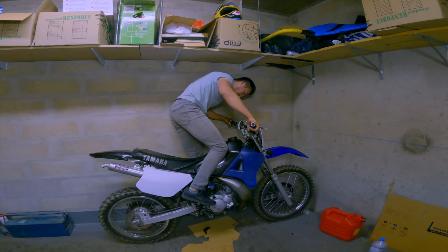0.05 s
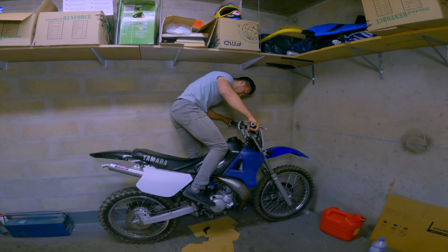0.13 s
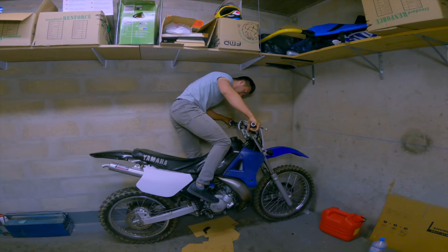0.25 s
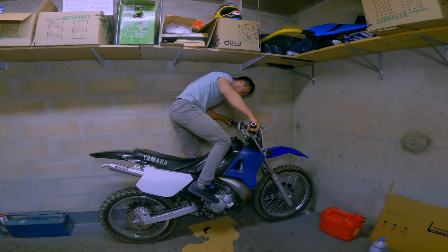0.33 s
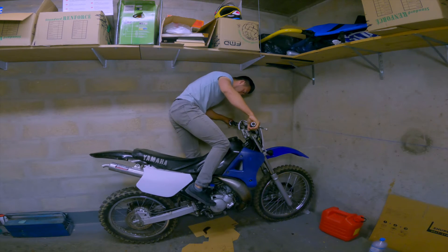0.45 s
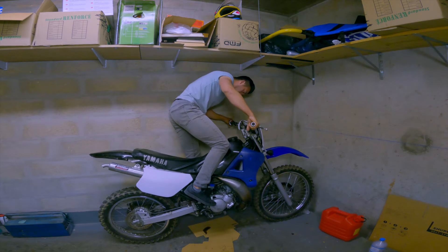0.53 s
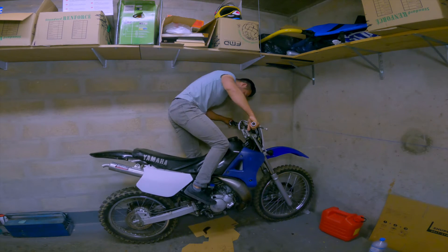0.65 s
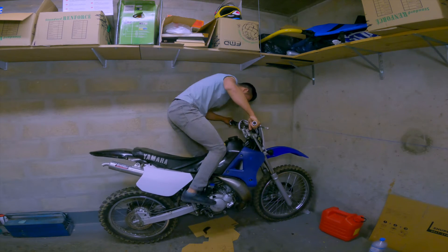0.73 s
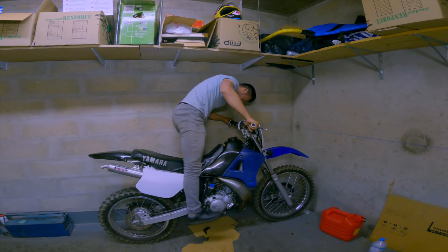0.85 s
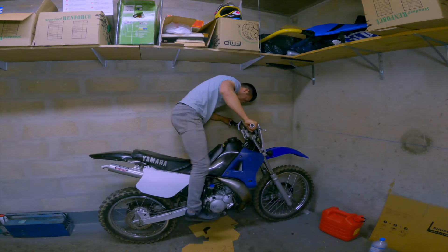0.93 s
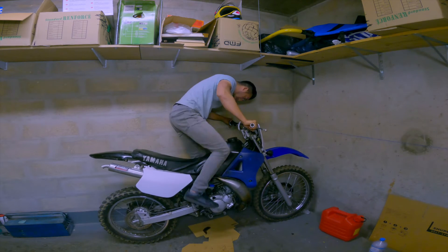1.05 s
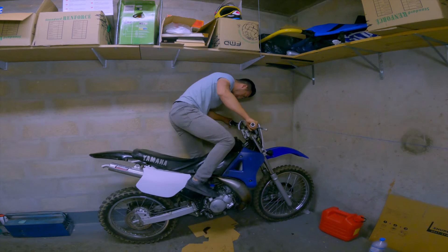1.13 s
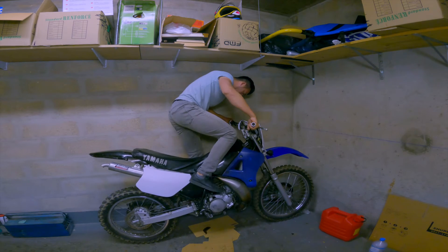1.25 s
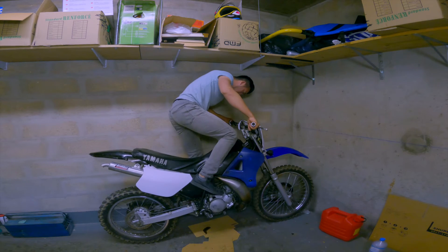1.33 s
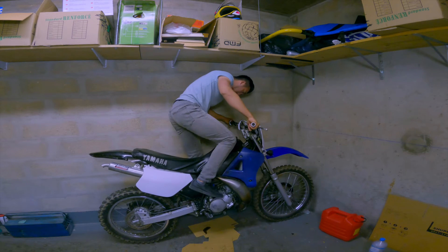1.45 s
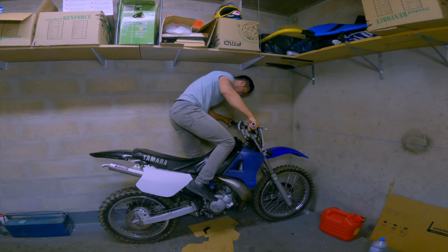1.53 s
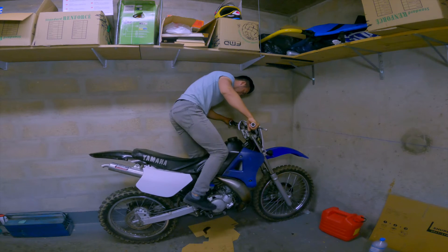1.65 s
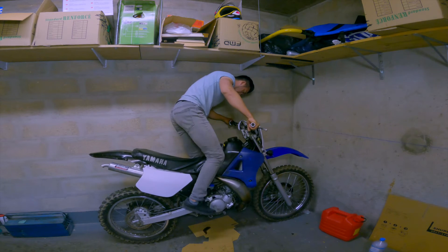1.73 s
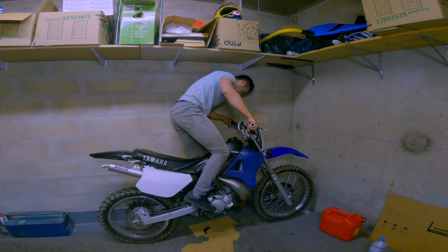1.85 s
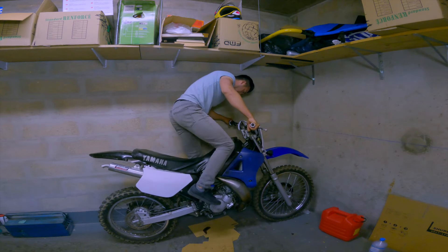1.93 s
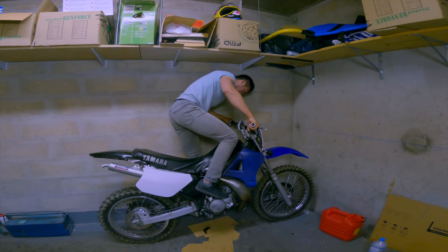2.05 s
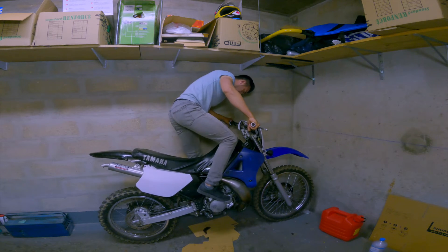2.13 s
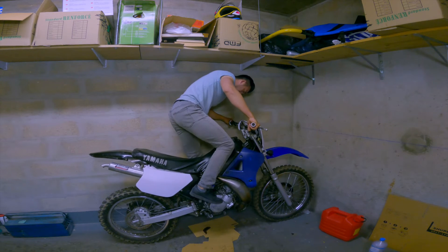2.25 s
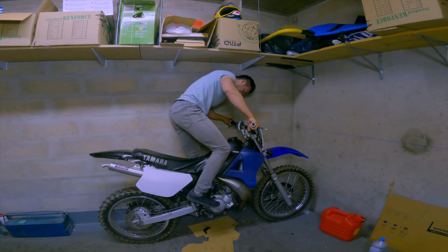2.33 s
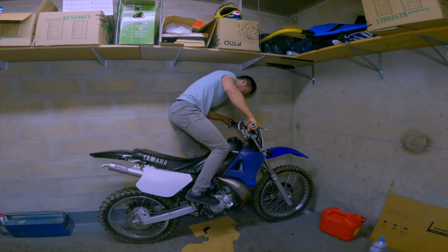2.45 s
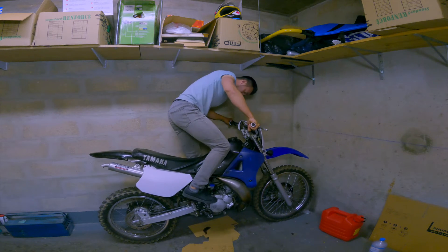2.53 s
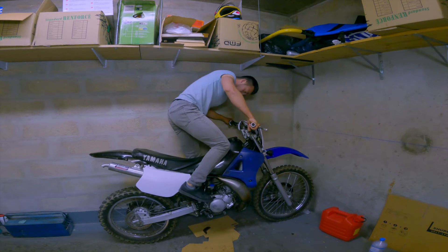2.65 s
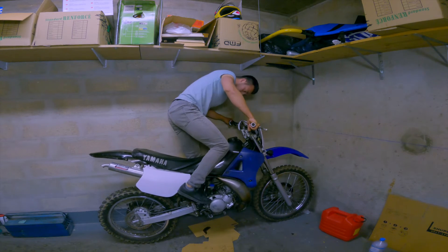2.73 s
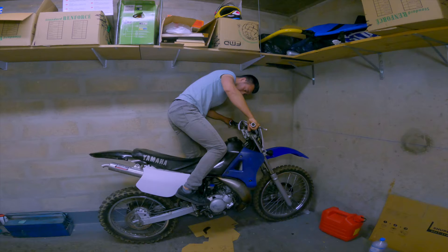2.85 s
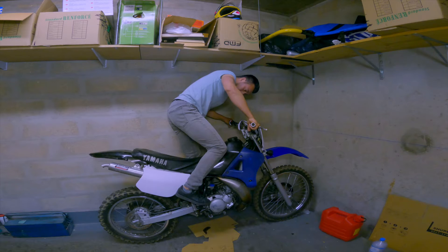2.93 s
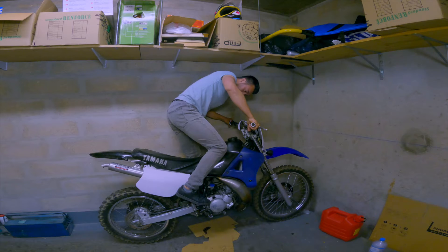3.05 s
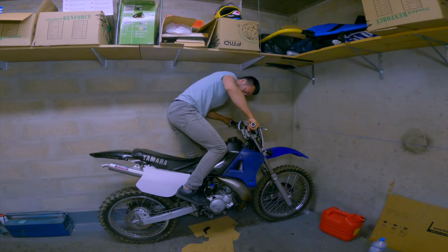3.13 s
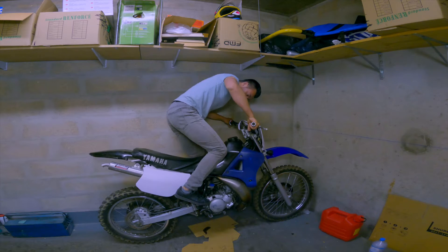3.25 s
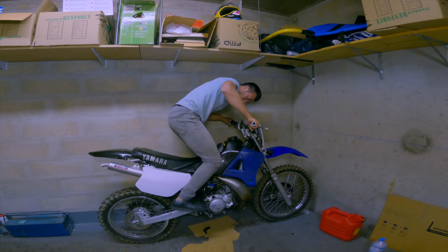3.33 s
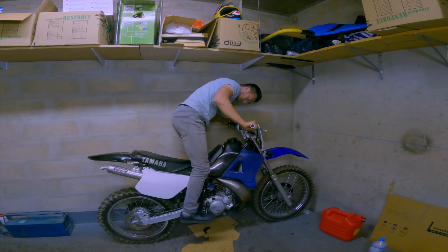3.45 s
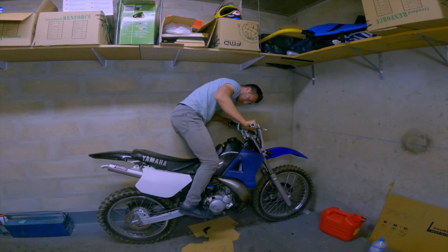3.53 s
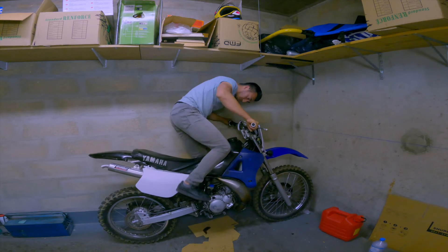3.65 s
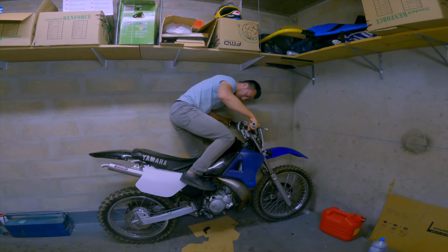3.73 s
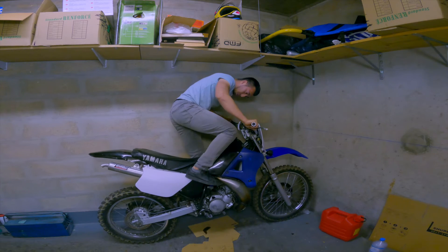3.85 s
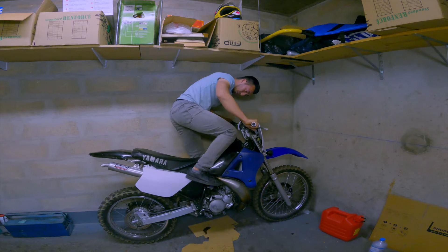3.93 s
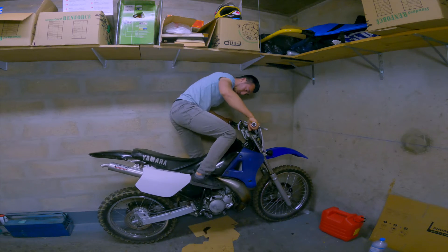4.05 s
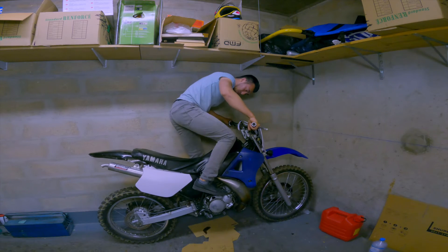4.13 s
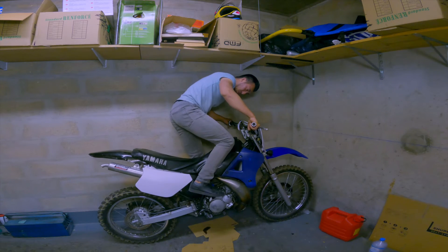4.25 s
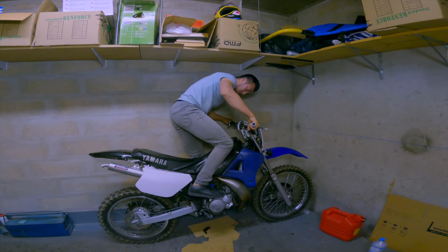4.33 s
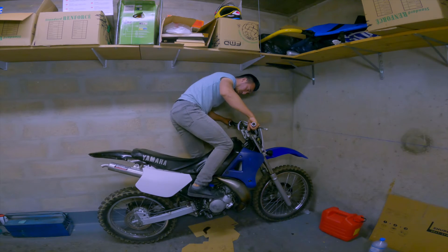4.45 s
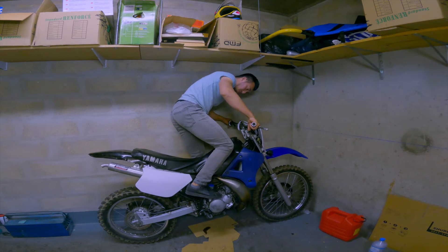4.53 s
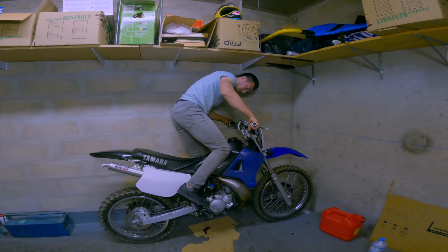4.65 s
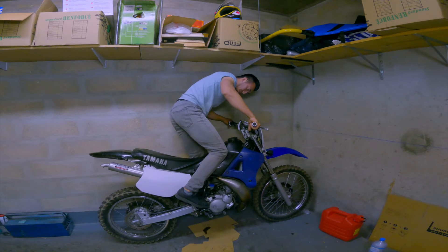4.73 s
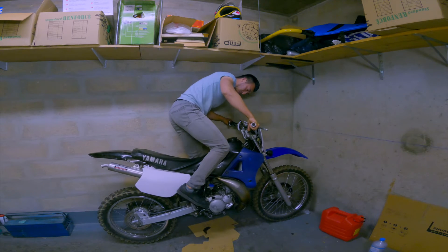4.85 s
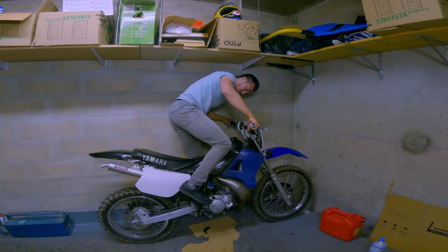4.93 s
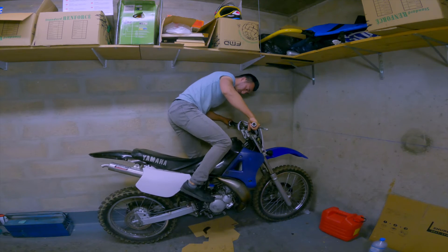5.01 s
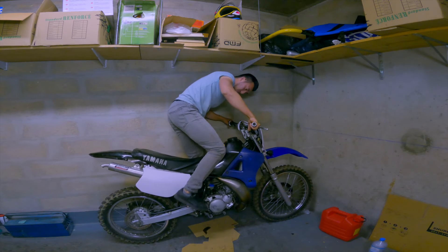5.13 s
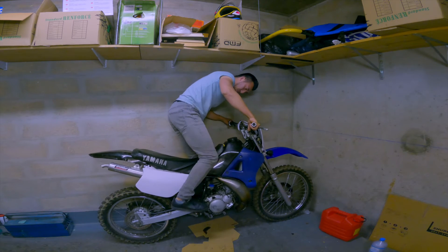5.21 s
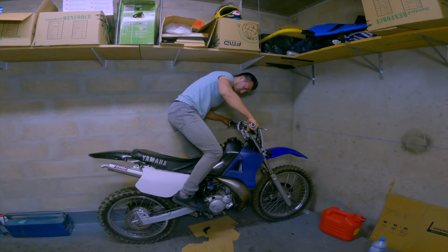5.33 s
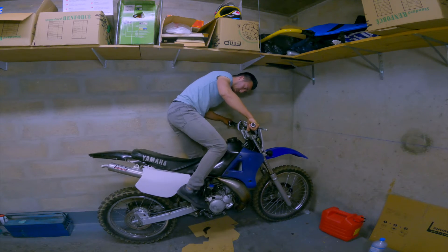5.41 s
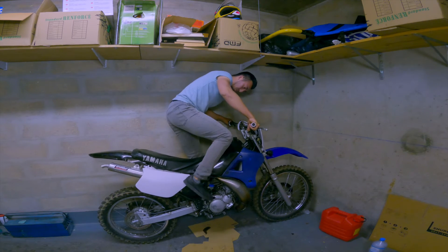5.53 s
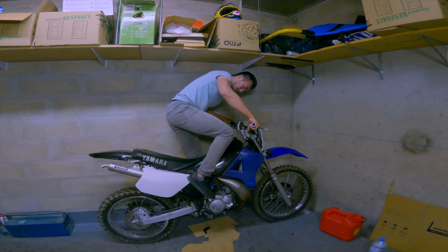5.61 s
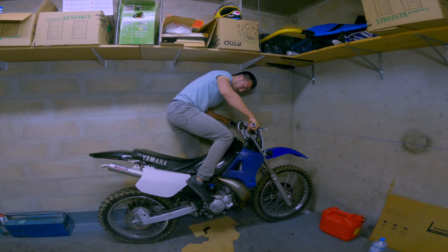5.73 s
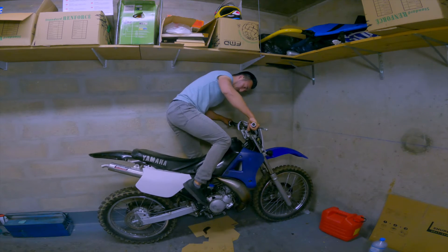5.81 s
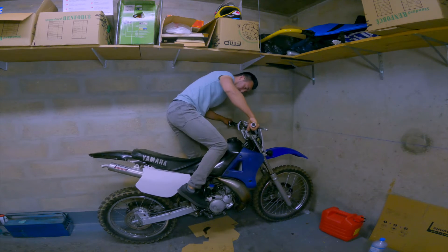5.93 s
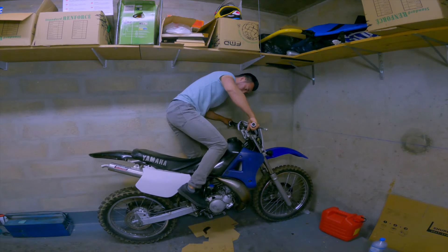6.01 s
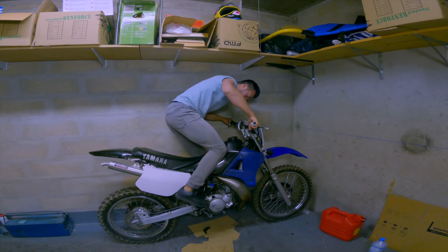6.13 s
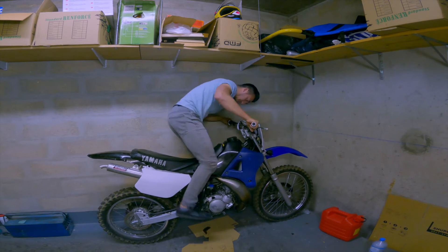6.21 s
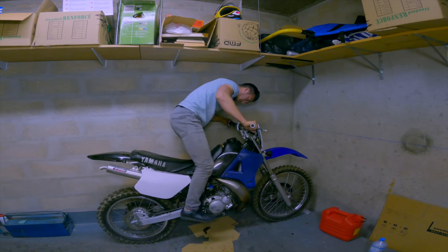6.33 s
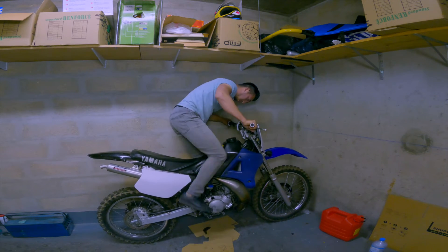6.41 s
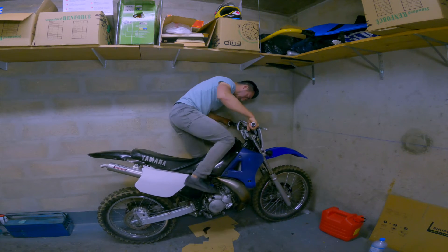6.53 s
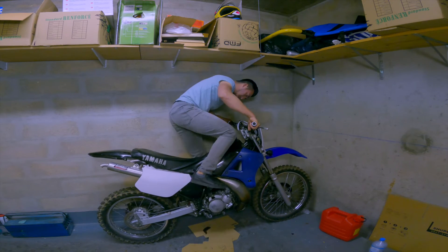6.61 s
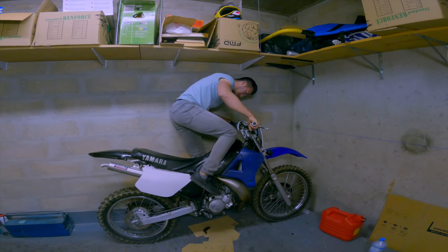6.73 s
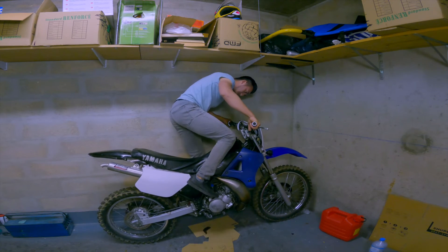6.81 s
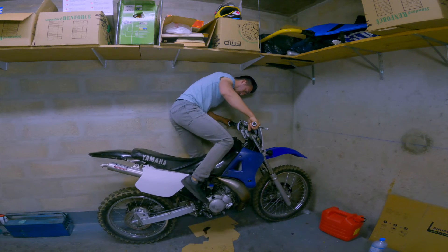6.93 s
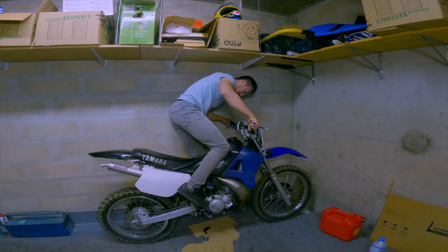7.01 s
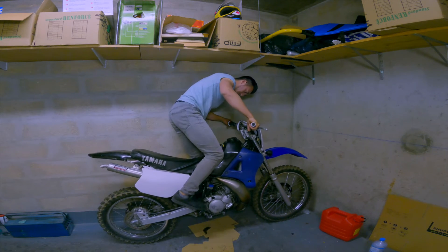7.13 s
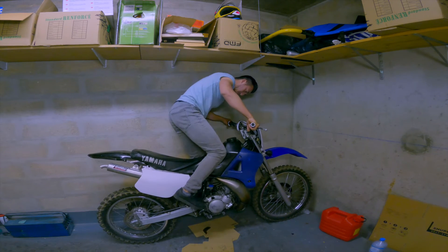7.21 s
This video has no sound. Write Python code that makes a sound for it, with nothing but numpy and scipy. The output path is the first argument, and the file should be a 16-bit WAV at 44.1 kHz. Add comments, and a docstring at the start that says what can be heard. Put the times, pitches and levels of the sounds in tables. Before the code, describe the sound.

A small concrete garage with quiet, steady air noise and short hard echoes. At first only faint frame bumps, a light click at 0.3 s and slight scuffs. At about 0.9 s a kick-start lever bites: steel clacks, gears whir in a coarse rattle for under a fifth of a second, and a few hollow low puffs thump from the exhaust, leaving a bass boom in the room. From 1.2 to 2.5 s the ratchet clacks, with sharper clicks near 2.0 and 2.1 s, scrapes and a tiny squeak. It is nearly quiet around 3 s. The second kick at 3.5 s has a heavier thump and rapid puffs to 3.75 s. Clicks and scrapes follow, with strong clacks near 4.7, 5.25 and 5.6 s. The third kick falls at 6.3 s, chuffing and rattling, then a few clacks, a light bump at 7 s and fading boom. The engine never fires.

```python
"""Kick-starting a dirt bike in a garage

A two-stroke dirt bike is kicked over three times in a small concrete garage and never fires.
Each kick spins the gears (clumps of tiny impacts) and pumps a few hollow puffs through the exhaust
(dying sines and a rush of noise), which set the room booming. Mostly between kicks, the lever and its
ratchet clack and squeak (short chatter, sliding whistles), and a boot scrapes for the next stroke.
The rider's weight rocks the frame, bare walls echo it all, and quiet air noise lies beneath."""
import sys
import numpy as np
from scipy import signal
from scipy.io import wavfile
from scipy.ndimage import uniform_filter1d

SR = 44100
rng = np.random.default_rng(int(sys.argv[2]) if len(sys.argv) > 2 else 0)


def digitize_waveform(pressure):
    """Quantize a signal to 16-bit integers and store it at the path in sys.argv[1].

    Rows of a 2-D input are taken as channels; values are limited to [-1, 1].
    """
    field = np.atleast_2d(pressure).T
    bounded = np.clip(field, -1, 1)
    quanta = np.round(bounded * 32767).astype(np.int16)
    wavfile.write(sys.argv[1], SR, quanta)


N = 320607
T = np.arange(N) / SR  # time of every sample [s]

# All levels are relative: each source has a further level of its own. t60 is the time to die by 60 dB.
# One row a kick: (ratchet bites [s], length of the stroke [s], heave [dB], gears [dB], sag of the gears [dB/s],
# rumble [dB], footpeg ring [dB], factor on the footpeg's pitch [-])
KICKS = [(0.887, 0.15, -28, -21.5, 1, -6, -39, 1.1), (3.461, 0.18, -17, -22.5, 32, -5.5, -51, 1.7),
         (6.309, 0.193, -16.5, -24, 6.5, -6.5, -36, 1.004)]
# One puff a turn of the crank: (time [s], level [dB], deep boom against the pipe's note [dB],
# factor on the pipe's pitch [-])
PUFFS = [(0.915, -11, -4.5, 1.0), (0.971, -19.5, 8, 0.76), (1.035, -12, -4, 0.97), (1.116, -7, -2, 1.0),
         (3.484, -7, -1.5, 0.94), (3.539, -6, 2, 0.94), (3.595, -6.5, -10, 0.96), (3.664, -7, -13, 0.99),
         (3.748, -7.5, -25, 0.99), (4.029, -19, 3.5, 0.96), (6.331, -10, -0.5, 0.97),
         (6.385, -6.5, -4, 0.85), (6.453, -6, -6, 0.97), (6.534, -7.5, -6, 0.97)]
# Notes of the exhaust pipe: (pitch [Hz], level [dB], t60 [s])
PIPE_MODES = [(62.2, -7.5, 0.2), (102.4, -7.5, 0.33), (138.7, -8.5, 0.31), (226.8, -14, 0.5),
              (331.6, -3.5, 0.15), (361.7, 0.5, 0.055), (437.8, 2, 0.063), (495, -12, 0.034)]
# Colour of the unburnt gas leaving the pipe: (frequency [Hz], level [dB])
GAS_COLOUR = [(100, -9), (250, -3.5), (330, 1), (430, -3.5), (520, -0.5), (650, -24), (1500, -38),
              (5000, -69.5), (12000, -120)]
# Colour of the gear rattle: (frequency [Hz], level [dB])
GEAR_COLOUR = [(120, -45), (250, -16.5), (450, -6), (850, -11.5), (1350, -14), (1500, -20), (1850, -19.5),
               (2600, -18), (3200, -25), (5900, -37.5), (11900, -45.5), (15000, -66.5)]
# Resonances of engine case and lever: (frequency [Hz], width [Hz], level [dB])
CASE_MODES = [(1260, 120, -8.5), (1500, 46, -13.5), (1844, 120, 2.5), (2025, 36, -0.5), (2584, 60, -4),
              (2870, 57, -13.5), (3370, 56, -2.5), (4150, 20, -43), (4750, 120, -3), (5200, 370, -2),
              (6050, 780, 0)]
# In every kick the ratchet bites, then the gears slam home: (delay after the bite [s], level [dB],
# treble tilt [dB/octave], chatter decay [s], pitch of the struck part [Hz], its ring [dB])
ENGAGE = [(0.0, -17, -7, 0.012, 1750, 2.5), (0.061, -15, -1, 0.0047, 1900, -4.5)]
# Lever and ratchet clacking, mostly between strokes, sometimes within one: (time [s], level [dB],
# treble tilt [dB/octave], chatter decay [s], pitch of the struck part [Hz], its ring [dB])
CLACKS = [(0.326, -33, -5, 0.021, 2980, -15), (0.585, -45.5, 7.5, 0.015, 1690, 17),
          (0.935, -15, 0.5, 0.035, 2580, -4), (1.158, -26.5, 6, 0.0066, 1780, 22),
          (1.253, -20, -0.5, 0.006, 1800, -10), (1.484, -39.5, 3.5, 0.037, 1499, 21),
          (1.643, -34, 0.5, 0.027, 1990, -1), (1.714, -32, -3, 0.0085, 2320, -1),
          (1.886, -42, 7, 0.0089, 2270, 14), (2.003, -18.5, 2, 0.0076, 1860, 6.5),
          (2.118, -22, -1, 0.0075, 1880, 2), (2.306, -35.5, 2.5, 0.015, 1934, 5),
          (2.434, -29, -3.5, 0.0081, 2070, 11), (2.89, -49, -6.5, 0.017, 1286, -1.5),
          (2.953, -59.5, 5, 0.013, 1315, 4.5), (3.174, -57.5, 0, 0.01, 1220, 6),
          (3.493, -17, 1.5, 0.0072, 1800, 4), (3.809, -17.5, 2, 0.0062, 6050, 3),
          (3.943, -21.5, -0.5, 0.0073, 1960, -12), (3.994, -31, -8, 0.011, 1330, -9),
          (4.212, -36.5, -3.5, 0.016, 1140, 18), (4.244, -44.5, 1, 0.013, 1500, 6),
          (4.298, -45, 5.5, 0.024, 1490, 25), (4.466, -42, 4.5, 0.014, 1690, 17),
          (4.553, -37.5, 5, 0.037, 1830, 14), (4.655, -37.5, 7, 0.039, 2020, 4),
          (4.697, -17, 1, 0.012, 3480, -3), (4.711, -23, -12, 0.011, 2590, -4),
          (4.995, -32, -4.5, 0.017, 1960, 3), (5.248, -20.5, -1, 0.006, 2980, 8),
          (5.517, -30, -2.5, 0.0067, 2580, -1), (5.577, -18, 2, 0.0077, 4200, 3),
          (5.698, -29.5, -5.5, 0.0048, 2060, 6), (5.855, -28, 1.5, 0.0049, 2480, -8),
          (5.87, -31.5, -2.5, 0.025, 2580, 6), (5.982, -30, -3.5, 0.0087, 2100, 10),
          (6.231, -30, -2.5, 0.018, 2400, -9), (6.630, -20.5, 0, 0.0059, 1845, 6),
          (6.775, -22, -0.5, 0.0061, 1950, -13), (7.006, -25.5, -1, 0.015, 1825, -29),
          (7.126, -25.5, -2, 0.0055, 2480, -2)]
# Colour of steel on steel: (frequency [Hz], level [dB])
STEEL_COLOUR = [(240, -21), (400, -8.5), (1020, -8.5), (1690, -3), (1820, -5.5), (2320, -3), (2540, -1.5),
                (3100, -3), (4130, -4), (11600, -32.5), (13100, -39.5), (15000, -75.5)]
# Footpeg notes: (pitch [Hz], level [dB], t60 [s])
FOOTPEG_MODES = [(5200, -1, 0.093), (5460, -1.5, .1), (8400, 2, .13), (9430, -27.5, .25), (11700, -6, .15),
                 (12560, -22, 0.18)]
# Boot and lever scraping: (time [s], level [dB], centre [Hz], decay [s])
SCRAPES = [(0.203, -48.5, 1880, 0.061), (0.686, -46.5, 1070, 0.025), (1.005, -18, 740, 0.03),
           (1.411, -55, 880, 0.032), (1.511, -38, 650, 0.017), (1.734, -35, 640, 0.025),
           (1.79, -33, 1720, 0.014), (1.829, -36.5, 805, 0.043), (1.925, -36, 1270, 0.044),
           (2.513, -32.5, 1770, 0.0098), (2.573, -36.5, 1090, 0.0071), (3.575, -39, 830, 0.0098),
           (3.713, -24, 780, 0.02), (3.772, -23, 2110, 0.0086), (4.217, -36.5, 670, 0.034),
           (4.488, -35, 1890, 0.019), (4.569, -35.5, 2000, 0.032), (4.673, -35, 2540, 0.028),
           (5.198, -31.5, 2140, 0.066), (5.459, -36, 1020, 0.0099), (5.499, -34, 2070, 0.038),
           (5.813, -38, 1900, 0.015), (6.182, -43.5, 2010, 0.1), (6.242, -29.5, 800, 0.023),
           (6.322, -16, 2130, 0.012), (6.424, -41.5, 1420, 0.011), (6.617, -25, 1820, 0.015),
           (6.754, -33.5, 1890, 0.015)]
# The lever's dry pivot squeaking: (time [s], level [dB], pitch [Hz], decay [s])
SQUEAKS = [(1.207, -48.5, 9660, 0.0092), (2.127, -32.5, 8800, 0.0045), (2.131, -33, 9160, 0.0047),
           (2.127, -53, 15200, .008), (5.447, -49.5, 3930, 0.017), (5.777, -40.5, 8440, 0.0031),
           (6.708, -57, 9680, 0.01)]
# Dull bumps of the frame, and one very faint short tap at 6.054 s: (time [s], level [dB],
# factor on the frame's pitch [-], knock against the low thud [dB])
BUMPS = [(0.004, -38, 0.79, 6), (0.053, -32.5, 1.02, -5), (0.3, -35, 0.95, -6.5), (0.835, -32, 0.89, -11),
         (1.673, -29, 0.99, 5), (2.123, -34.5, 0.94, -2.5), (2.243, -34, 0.89, 6),
         (2.499, -35.5, 0.79, 2.5), (3.416, -21, 0.71, 0.5), (4.217, -31, 0.95, 1.5),
         (4.724, -19.5, 0.99, 2.5), (5.257, -23, 0.95, -3.5), (6.054, -52.5, 1.05, 11),
         (6.238, -18.5, 0.89, 5), (7.01, -35, 0.99, 6)]
# Notes of the frame: (pitch [Hz], level [dB], t60 [s])
FRAME_MODES = [(71.3, -5, 0.42), (138.4, 1.5, 0.25), (179.5, -3.5, 0.25), (202, -9.5, 0.07),
               (310, -4, 0.13), (423, 0, 0.032)]
# The rider shifting his weight between kicks: (time [s], rumble [dB], rustle [dB])
ROCKING = [(0.0, -33, -36.5), (0.16, -37, -66.5), (0.55, -43, -50.5), (0.78, -51, -63), (1.55, -34, -60),
           (1.882, -23.5, -44), (2.06, -38.5, -50.5), (2.6, -42.5, -48.5), (2.78, -51, -61.5),
           (3.28, -62.5, -83), (3.8, -49, -36), (4.42, -41.5, -63), (4.78, -29, -42), (5.14, -43.5, -60),
           (5.3, -32.5, -49.5), (6.13, -55, -57.5), (6.6, -56, -52), (7.27, -28, -53)]
# Colour of tyres and panels: (frequency [Hz], level [dB])
RUMBLE_COLOUR = [(15, -29.5), (30, -18), (45, -14), (68, -2), (85, -3.5), (105, -2), (140, -2.5),
                 (175, -12.5), (260, -24.5), (340, -16), (480, -24), (800, -31), (2000, -75), (12000, -130)]
# Colour of clothes and seat: (frequency [Hz], level [dB])
RUSTLE_COLOUR = [(150, 6), (400, 13.5), (1000, 8), (1900, 6), (3200, 4.5), (6000, -15.5), (8000, -13),
                 (12000, -41.5), (15000, -41)]
# How long the echoes last: (frequency [Hz], t60 [s])
ECHO_T60 = [(100, 1), (400, 0.44), (1300, 0.44), (3500, 0.48), (7000, 0.49), (14000, 0.045)]
# Standing waves between the walls: (frequency [Hz], level [dB], t60 [s])
STANDING_WAVES = [(70.8, -9, 1.2), (80.7, -4.5, 1.5), (99.7, -1, 1.91), (124, -13.5, 0.72),
                  (136.9, -10.5, 2.4)]
# Colour of the echoes that both sides share: (frequency [Hz], level [dB])
SHARED_ECHO_COLOUR = [(40, -25.5), (150, -14.5), (400, -7.5), (900, -2.0), (3000, -8), (10000, -2.5)]
# Colour of the echoes that differ from left to right: (frequency [Hz], level [dB])
SIDE_ECHO_COLOUR = [(60, -39.5), (250, -29), (550, -10.5), (2000, -8), (5000, -9.5), (12000, -5.5)]
# Colour of the still air: (frequency [Hz], level [dB])
AIR_COLOUR = [(18, -35), (30, -4), (97, -5), (200, -7.5), (253, -25), (426, -22.5), (567, -52.5),
              (978, -26), (1920, -26), (3680, -41), (7060, -34.5), (15000, -64)]

# The gears take up their slack, spin while the leg pushes, then coast to rest.
SLACK_DB, SLACK_DB_PER_S, BITE_S = -5, 326, 0.006
COAST_DB_PER_S = 62
# The rider's weight comes on this long before the ratchet bites, and the bike bounces at this pitch.
LEAD_S, HEAVE_HZ = 0.049, 62
# The bike shakes on its tyres through the stroke, a little longer, then settles.
SHAKE_DB_PER_S, SHAKE_PEAK_S, SHAKE_HOLD_S, SETTLE_DB_PER_S = 231, 0.064, 0.042, 53.5
# The clack at the bottom of the stroke.
STOP_DB, STOP_TILT_DB, STOP_DECAY_S, STOP_HZ, STOP_RING_DB = -18, 6.5, 0.0067, 1590, 10.5
# First contact against the chatter; the chatter's rise as a share of its decay.
BITE_DB, RISE_SHARE = -13.5, 0.2
TICKS_PER_S, TICKS_DB = 25, -12.5  # loose small parts, against the rustle
AIR_DB = -60.5
EDGE_HZ = 15150  # upper edge of the whole sound


def exhaust(rise=0.0029, gas_db=-11, level_db=-1):
    """The piston uncovers the port once a turn; unburnt gas thumps the pipe and rushes out."""
    out, t = np.zeros(N), T[:SR // 2]
    deep = np.array([hz < 200 for hz, _, _ in PIPE_MODES])[:, None]
    outflow = np.exp(-t / 0.045)
    for s, db, boom_db, pitch in PUFFS:
        modes = ring(PIPE_MODES, t, pitch) * (1 - np.exp(-t / rise))
        note = (modes * ~deep).sum(0)  # the hollow bark of the silencer
        boom = (modes * deep).sum(0) * amp(boom_db) / abs(note).max()  # the whole length of the pipe
        gas = colour(rng.standard_normal(len(t)) * outflow, GAS_COLOUR)
        puff = peaked(note) + amp(6.5) * boom + amp(gas_db) * peaked(gas)
        add(out, s, amp(db + level_db) * puff)
    return out


def gears(swing_db=4, lag_turns=0.72, clump_db=5.0, level_db=-3):
    """Teeth and chain rattle in clumps while the crank spins, hardest as the piston comes up on compression."""
    puff_times = [row[0] for row in PUFFS]
    turns = np.interp(T, puff_times, np.arange(len(PUFFS)))
    swing = swing_db * np.cos(2 * np.pi * (turns - lag_turns))
    clumps = np.tanh(evened(uniform_filter1d(rng.standard_normal(N), size=300)))
    impacts = grit(N, per_s=1300, spread_db=2.0) * amp(clump_db * clumps)
    teeth = evened(colour(case(impacts), GEAR_COLOUR))
    return teeth * spin() * amp(level_db + swing)


def spin():
    """Loudness of the gear train: slack taken up, a sudden bite, a sag through the stroke, a coast to rest."""
    out = np.zeros(N)
    for start, stroke, _, db, sag_db_per_s, *_ in KICKS:
        t = T - start
        slack = amp(SLACK_DB - SLACK_DB_PER_S * abs(t))
        sag_db = sag_db_per_s * np.clip(t, 0, stroke)
        coast_db = COAST_DB_PER_S * np.maximum(t - stroke, 0)
        bite = np.clip(t / BITE_S, 0, 1)
        out += amp(db) * (slack + bite * amp(-sag_db - coast_db))
    return out


def clacks():
    """Every stroke engages and bottoms out alike; other clacks of lever and ratchet fall mostly between."""
    out = np.zeros(N)
    for start, stroke, *_ in KICKS:
        for delay, *blow in ENGAGE:
            add(out, start + delay, clack(*blow))
        add(out, start + stroke, clack(STOP_DB, STOP_TILT_DB, STOP_DECAY_S, STOP_HZ, STOP_RING_DB))
    for s, *blow in CLACKS:
        add(out, s, clack(*blow))
    return out


def clack(db, tilt_db, decay, hz, ring_db, part_width=0.12, level_db=-3):
    """Steel strikes steel once, then chatters briefly in its play; each part rings at its own pitch."""
    age = T[:SR // 4] / decay  # time counted in decays
    chatter = grit(len(age), per_s=3000, spread_db=4.0)
    chatter *= (1 - np.exp(-age / RISE_SHARE)) * np.exp(-age)
    chatter /= np.linalg.norm(chatter)
    chatter[0] += amp(BITE_DB)
    steel = case(chatter) + amp(ring_db) * resonate(chatter, hz, part_width * hz)
    return amp(db + level_db) * peaked(colour(steel, STEEL_COLOUR, tilt_db))


def footpeg(rise=0.0015, swell=0.041, boom_db=-21):
    """A brief high ring at the bottom of each stroke; the jolt of the rider's weight sets the room booming."""
    out, boom, t = np.zeros(N), np.zeros(N), T[:2 * SR]
    for start, stroke, *_, db, pitch in KICKS:
        peg = ring(FOOTPEG_MODES, t, pitch).sum(0) * (1 - np.exp(-t / rise))
        room = ring(STANDING_WAVES, t).sum(0) * (1 - np.exp(-t / swell))
        add(out, start + stroke, amp(db) * peaked(peg))
        add(boom, start + stroke, amp(boom_db) * peaked(room, size=2048))
    return out, boom


def scrapes(rise=0.0009, width=0.54, rasp_db=-9, level_db=-3, bend=0.05, bend_s=0.02):
    """Short runs of stick and slip: a hollow colour that bends as the pressure changes, and a wider rasp."""
    out, t = np.zeros(N), T[:SR // 4]
    for s, db, hz, decay in SCRAPES:
        slips = case(grit(len(t), per_s=1100, spread_db=-0.5))
        slips = slips * (1 - np.exp(-t / rise)) * np.exp(-t / decay)
        hollow = resonate(resonate(slips, hz, width * hz), hz, width * hz)
        # the bend shifts all frequencies of the hollow sound by up to a twentieth of its centre, up and down
        drift_hz = bend * hz * np.sin(t / bend_s + 2 * np.pi * rng.random())
        shift = np.exp(2j * np.pi * np.cumsum(drift_hz) / SR)
        hollow = (signal.hilbert(hollow) * shift).real
        rasp = colour(slips, STEEL_COLOUR)
        add(out, s, amp(db + level_db) * (peaked(hollow) + amp(rasp_db) * peaked(rasp)))
    return out


def squeaks(rise=0.00023, glide=0.054, glide_s=0.0012, waver=0.012):
    """A thin, unsteady whistle that slides up to its pitch as the pivot slips."""
    out, t = np.zeros(N), T[:SR // 5]
    for s, db, hz, decay in SQUEAKS:
        wobble = evened(uniform_filter1d(rng.standard_normal(len(t)), size=64))
        pitch_hz = hz * (1 - glide * np.exp(-t / glide_s) + waver * wobble)
        whistle = np.sin(2 * np.pi * np.cumsum(pitch_hz) / SR)
        whistle *= (1 - np.exp(-t / rise)) * np.exp(-t / decay)
        add(out, s, amp(db) * peaked(whistle))
    return out


def bumps(rise=0.006, level_db=-4):
    """Dull knocks of the frame under the rider's weight, and one very faint short tap, as dying sines."""
    out, t = np.zeros(N), T[:SR // 2]
    knocks = np.array([hz > 260 for hz, _, _ in FRAME_MODES])[:, None]
    for s, db, pitch, knock_db in BUMPS:
        modes = ring(FRAME_MODES, t, pitch) * amp(knock_db * knocks)
        add(out, s, amp(db + level_db) * peaked(modes.sum(0) * (1 - np.exp(-t / rise))))
    return out


def heaves(swell=0.0095):
    """As the rider's weight comes on, the whole bike bounces on its tyres for a few deep cycles."""
    out, t = np.zeros(N), T[:SR // 4]
    bounce = peaked(t * np.exp(-t / swell) * np.sin(2 * np.pi * HEAVE_HZ * t))
    for start, _, db, *_ in KICKS:
        add(out, start - LEAD_S, amp(db) * bounce)
    return out


def rocking(rumble_db=-9, rustle_db=-4):
    """Tyres and panels rumble, clothes and seat crackle, as the rider kicks and shifts his weight."""
    s, low_db, high_db = np.transpose(ROCKING)
    rumble = evened(colour(rng.standard_normal(N), RUMBLE_COLOUR))
    rumble *= np.hypot(shake(), amp(np.interp(T, s, low_db)))  # kicks and shifts add as powers
    rustle = evened(colour(case(grit(N, per_s=1200, spread_db=0.5)), RUSTLE_COLOUR))
    rustle *= amp(np.interp(T, s, high_db))
    return amp(rumble_db) * rumble + amp(rustle_db) * rustle


def shake():
    """How hard the kicks shake the bike: a quick swell, a hold through the stroke, a slow settling."""
    out = np.zeros(N)
    for start, stroke, _, _, _, db, *_ in KICKS:
        swell_db = SHAKE_DB_PER_S * np.maximum(start + SHAKE_PEAK_S - T, 0)
        settle_db = SETTLE_DB_PER_S * np.maximum(T - start - stroke - SHAKE_HOLD_S, 0)
        out += amp(db - swell_db - settle_db)
    return out


def ticks(tilt_db=3):
    """Loose small parts tick at random, the louder the more the rider moves."""
    s, _, moving_db = np.transpose(ROCKING)
    taps = evened(colour(case(grit(N, per_s=TICKS_PER_S, spread_db=4.0)), STEEL_COLOUR, tilt_db))
    return taps * amp(np.interp(T, s, moving_db) + TICKS_DB)


def garage(x, wall_db, wide_db=-2, standing_db=-1):
    """Bass gathers in standing waves and is alike on both sides; the echoes above it are wider."""
    boom = np.zeros(N)
    for hz, db, t60 in STANDING_WAVES:
        width_hz = np.log(1000) / np.pi / t60  # the longer it rings, the narrower it is
        boom += amp(db + standing_db) * resonate(x, hz, width_hz)
    shared = signal.fftconvolve(colour(x, SHARED_ECHO_COLOUR), echo())[:N] * amp(wall_db)
    side = signal.fftconvolve(colour(x, SIDE_ECHO_COLOUR), echo())[:N] * amp(wall_db + wide_db)
    mid = x + boom + shared
    return np.array([mid + side, mid - side])


def echo(early_db=5, early_s=0.042):
    """Dense reflections off bare walls: strong at first, then each band dying at its own speed."""
    t = T[:SR]
    taps = rng.choice([-1., 1.], SR) * (rng.random(SR) < 5000 / SR) * (t > 0.002)
    early = 1 + amp(early_db) * np.exp(-t / early_s)
    hz, at, bands = signal.stft(taps * early, SR, nperseg=256)
    fade = amp(-60 * at / read(ECHO_T60, hz)[:, None])
    tail = signal.istft(bands * fade, SR, nperseg=256)[1]
    return tail / np.linalg.norm(tail)


def air():
    """Still air: steady coloured noise, partly shared by both sides and partly separate."""
    shared, left, right = (evened(colour(noise, AIR_COLOUR)) for noise in rng.standard_normal((3, N)))
    return amp(AIR_DB) * (shared + 0.42 * np.array([left, right]))


def case(x):
    """Metal contacts are heard directly and through the ringing engine case."""
    return x + sum(amp(db) * resonate(x, hz, width) for hz, width, db in CASE_MODES)


def grit(count, per_s, spread_db):
    """Random tiny impacts of uneven size and either sign, over a number of samples."""
    size = amp(spread_db * np.minimum(rng.exponential(1, count), 4))
    hits = rng.random(count) < per_s / SR
    return evened(size * rng.choice([-1, 1], count) * hits)


def ring(modes, t, pitch=1):
    """Dying sines, one row a mode."""
    return np.array([amp(db - 60 * t / t60) * np.sin(2 * np.pi * hz * pitch * t) for hz, db, t60 in modes])


def resonate(x, hz, width):
    """One resonance with a gain of about one at its centre; the narrower, the longer it rings."""
    r = np.exp(-np.pi * width / SR)
    return 2 * signal.lfilter([1 - r], [1, -r * np.exp(2j * np.pi * hz / SR)], x).real


def colour(x, points, tilt_db=0, size=8192):
    """Filter with the given spectrum that never sounds early; tilted by some dB an octave above 1 kHz."""
    hz = abs(np.fft.fftfreq(size, 1 / SR))
    octaves = np.log2(np.maximum(hz, 1000) / 1000)
    log_gain = np.log(amp(read(points, hz) + tilt_db * octaves))
    # minimum phase: the energy comes as soon as it can
    taps = np.fft.ifft(np.exp(np.conj(signal.hilbert(log_gain)))).real
    return signal.fftconvolve(x, taps[:size // 2])[:len(x)]


def read(points, hz):
    """Reads a table between its points, on a log-frequency axis."""
    f, value = np.transpose(points)
    return np.interp(np.log(hz + 1), np.log(f + 1), value)


def amp(db):
    """Decibels to gain."""
    return 10 ** (np.asarray(db) / 20)


def evened(x):
    """Scales to an rms (average strength) of one."""
    return x / np.sqrt(np.mean(x ** 2) + 1e-20)


def peaked(x, size=256):
    """Scales so that the loudest stretch of some samples has an rms of one."""
    return x / np.sqrt(uniform_filter1d(x ** 2, size).max() + 1e-20)


def add(mix, s, sound):
    """Mixes a sound in at time s."""
    part = mix[max(round(s * SR), 0):][:len(sound)]
    part += sound[:len(part)]


def scene():
    """Each part of the bike meets the walls with its own echo, over still air."""
    peg, boom = footpeg()
    bike = garage(exhaust(), wall_db=-1.0)
    bike += garage(gears(), wall_db=0)
    bike += garage(clacks() + ticks() + peg, wall_db=1.5) + boom
    bike += garage(scrapes() + squeaks(), wall_db=2.0)
    bike += garage(bumps() + heaves() + rocking(), wall_db=3)
    return amp(-3.0) * bike + air()


def record(dry):
    """A steep low-pass filter takes away what lies above the upper edge."""
    low_pass = signal.firwin(511, EDGE_HZ, window=("kaiser", 9), fs=SR)
    return signal.oaconvolve(dry, low_pass[None], "same")


dry = scene()
out = record(dry)
digitize_waveform(out)
```